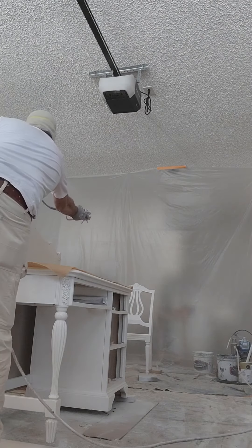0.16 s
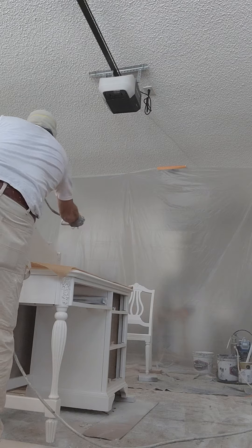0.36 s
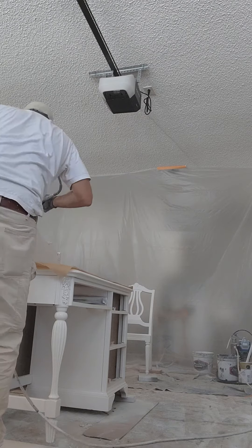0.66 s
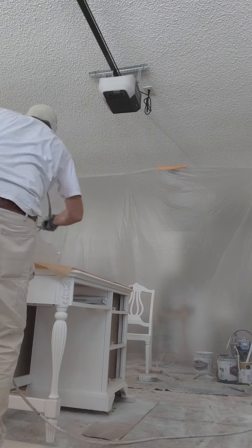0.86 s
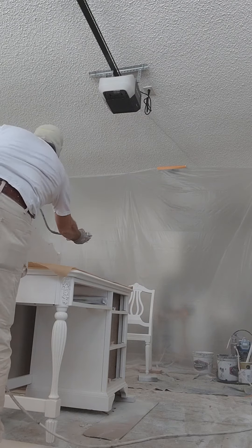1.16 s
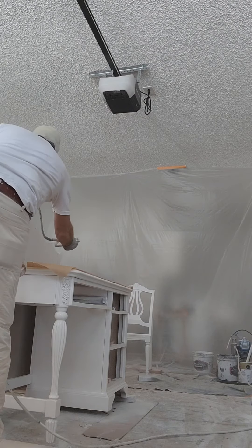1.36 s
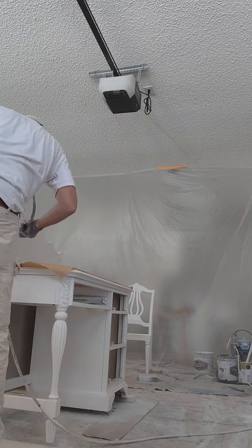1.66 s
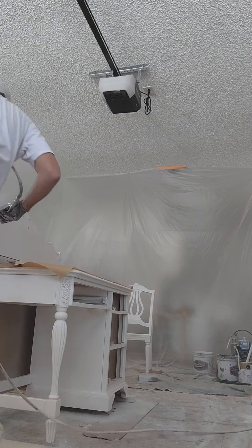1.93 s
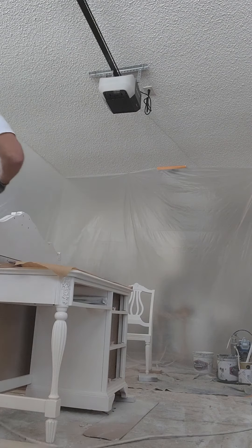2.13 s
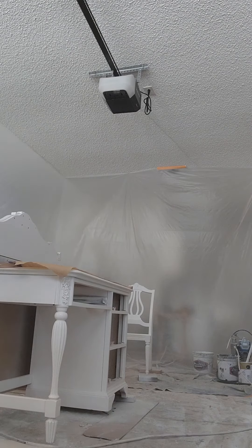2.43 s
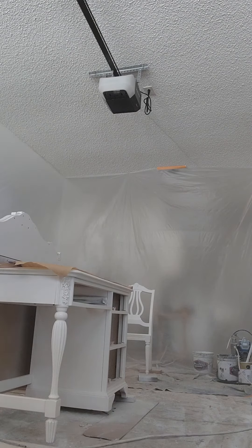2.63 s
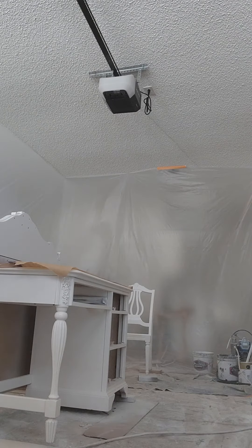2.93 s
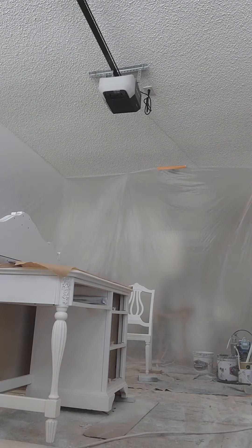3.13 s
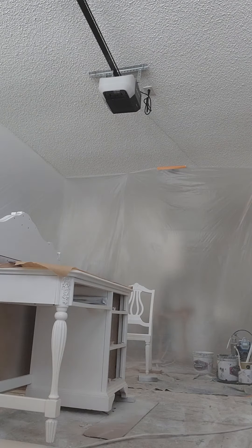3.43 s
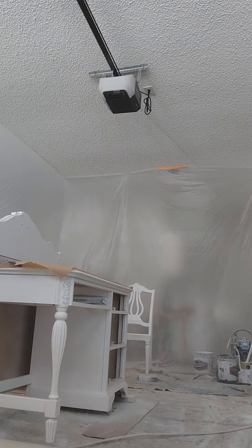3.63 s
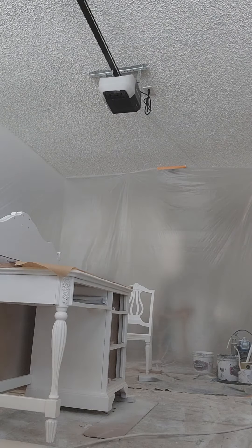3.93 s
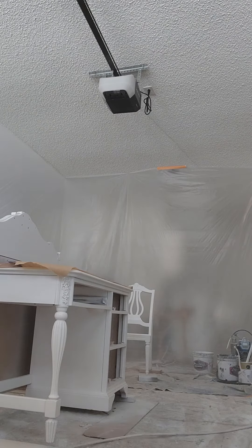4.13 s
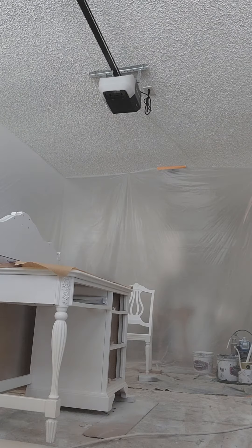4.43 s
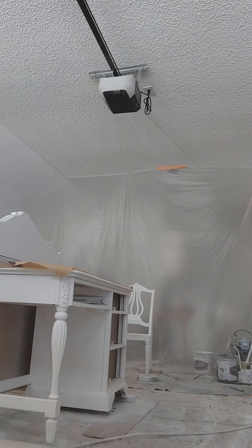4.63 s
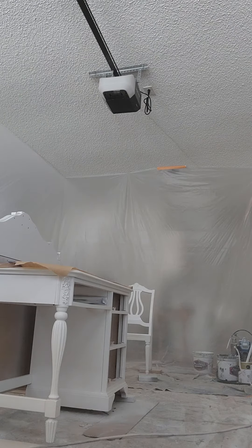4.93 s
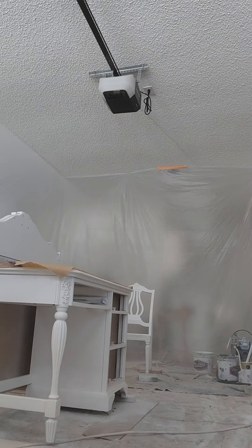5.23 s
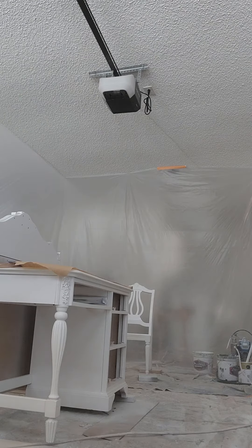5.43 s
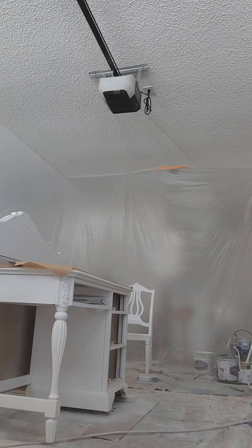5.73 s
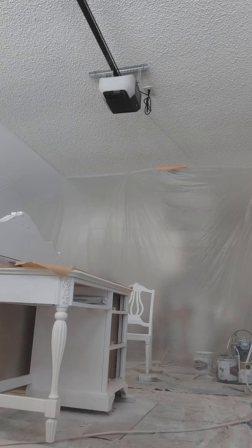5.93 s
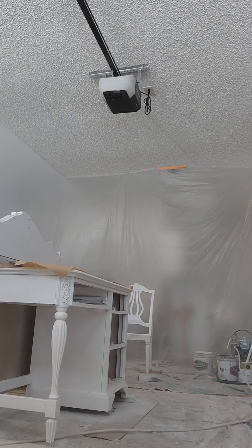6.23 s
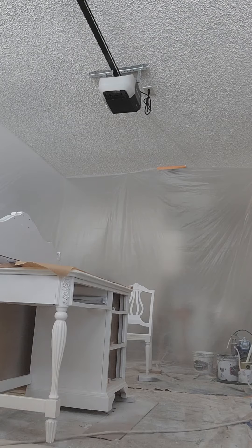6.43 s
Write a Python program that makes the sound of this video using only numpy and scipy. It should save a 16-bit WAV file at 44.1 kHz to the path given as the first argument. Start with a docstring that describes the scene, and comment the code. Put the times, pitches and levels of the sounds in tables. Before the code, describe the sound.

A paint spray gun hisses in bright bursts in a garage, each starting with a soft thump while the jet drums low and unevenly on wooden furniture. Four bursts of about 0.4 seconds run from the start to 1.8 seconds. In the lull that follows, feet or a hose scuff the floor faintly at about 2.1 seconds. Spraying resumes at 2.6 seconds with a longer burst, then continues in gradually shorter passes, loudest around 5.5 seconds, with three quick spurts from 6.1 to 6.7 seconds. An electric pump runs in half-second spells, starting near 0.5, 1.3, 2.9, 3.8, 4.8 and 5.8 seconds. Each time its motor growls, its gears whine in quick pulses that stand out above the hiss, and its valves puff. The bare walls add a short echo over a faint room hush, heard in stereo through a phone.

```python
"""An airless paint gun sprays furniture in a garage: each trigger pull lets out a hissing jet,
and the blast drums on the wood. An electric piston pump runs in short spells: its gears whine
once a stroke, its valves puff and its housing growls. Feet and hose scuff the floor.
The bare walls echo, and a phone with two microphones listens."""
import sys
import numpy as np
from scipy import signal
from scipy.fft import rfft, irfft, next_fast_len
from scipy.io import wavfile
from scipy.ndimage import uniform_filter1d, map_coordinates

SR = 44100
rng = np.random.default_rng(int(sys.argv[2]) if len(sys.argv) > 2 else 0)


def master_out(mix):
    """Clip the mix to full scale and print it as 16-bit PCM to the path in sys.argv[1]."""
    frames = np.transpose(np.atleast_2d(mix))
    ceiling = np.clip(frames, -1, 1)
    pcm = np.round(ceiling * 32767).astype(np.int16)
    wavfile.write(sys.argv[1], SR, pcm)


N = 290005
LEAD = SR // 2  # extra samples before time zero, so the walls already ring
T = np.arange(-LEAD, N) / SR

# Spells of spray hiss: trigger pulls, plus one faint lingering hiss near 5.8 s.
# Each row: start, end and rise time in seconds, then fizz, hiss and starting thump in dB.
HISS_SPELLS = [(-.3, .241, .01, -37, -39.5, -50), (.409, .762, .011, -35.5, -40, -39),
               (.876, 1.352, .012, -34.5, -39.5, -48), (1.411, 1.82, .03, -37.5, -41, -37),
               (2.638, 3.278, .0065, -33.5, -38.5, -32), (3.414, 3.817, .021, -35, -38, -38),
               (3.86, 4.232, .019, -37, -40.5, -33), (4.28, 4.591, .022, -36, -38.5, -42),
               (4.661, 4.965, .015, -34, -39.5, -32), (5.037, 5.324, .02, -34.5, -38.5, -42),
               (5.404, 5.68, .015, -29.3, -36.5, -38), (5.736, 5.91, .028, -53, -50, -70),
               (6.081, 6.226, .023, -35, -39.5, -28.5), (6.339, 6.455, .02, -34, -40, -32),
               (6.556, 6.7, .01, -37, -43, -33)]
# The jet's high fizz, hiss and low roar. Each row: frequency in Hz, relative level in dB.
FIZZ_TONE = [(8000, -16), (10000, -9), (11300, -4.5), (13000, 2), (16000, -1.5)]
HISS_TONE = [(260, -71), (450, -20), (547, -24), (639, -19.5), (1050, -11.5), (1130, -13), (2140, -10),
             (2880, -12), (5580, -1.5), (7420, -3.5), (10000, -23), (13000, -59), (22000, -120)]
ROAR_TONE = [(150, -64), (285, -0.5), (480, -6.5), (700, -9.5), (950, -48)]
# How hard the jet hits the wood. Each row: time in seconds, level in dB.
BLAST_LEVELS = [(0, -44.5), (.3, -50), (.7, -49), (.8, -30), (.86, -39), (.92, -40.5), (1.0, -49),
                (1.3, -58), (1.6, -55), (1.85, -41), (2.1, -52), (2.64, -50), (2.95, -47), (3.25, -34),
                (3.46, -39), (3.7, -56), (3.8, -43), (4.0, -51), (4.2, -36), (4.4, -38), (4.55, -51),
                (5.0, -46), (5.25, -30.5), (5.4, -36), (5.5, -30), (5.66, -31), (5.8, -54), (6.04, -60),
                (6.1, -39), (6.58, -48)]
# The drumming wood. Each row: frequency in Hz, relative level in dB.
DRUM_TONE = [(20, -39), (41, -13), (65, -1), (88, 2), (125, 0), (170, 0), (215, -7), (280, -14), (400, -22),
             (600, -90)]
# Pump runs. Each row: on and off times in seconds, growl in dB, then the spin-up whine's time in seconds,
# level in dB and early pitch in Hz, and last the time in seconds when the piston is at the bottom.
PUMP_RUNS = [(-.3, -.045, -29, -.2, -30, 1100, -.6), (.461, .92, -32.5, .55, -27, 1025, .548),
             (1.324, 1.865, -31.5, 1.434, -23, 1100, 1.498), (2.873, 3.408, -31, 2.986, -20.5, 1102, 3.041),
             (3.84, 4.384, -31.5, 3.945, -26, 1103, 4.009), (4.787, 5.35, -31.5, 4.894, -22, 1115, 4.956),
             (5.802, 6.097, -31, 5.88, -28, 1122, 5.947)]
# The piston goes up, down, up, down.
# Each row: seconds after the bottom, whine in dB, early pitch in Hz, valve puff in dB.
PISTON_STROKES = [(0, -21, 1600, -29.5), (.11, -20.5, 1475, -30.5), (.232, -21, 1545, -26),
                  (.342, -24.5, 1460, -32)]
# Notes the pump housing rings at. Each row: frequency in Hz, width in Hz, relative level in dB.
HOUSING_NOTES = [(284, 13.3, -6.5), (446, 65, -11), (515, 25, -7), (595, 50, -4), (820, 27, -10),
                 (1100, 38, -4.5), (1300, 46, -1.5), (1526, 200, -5), (2215, 77, -8), (3046, 56, -11)]
# Broad motor noise and valve puffs. Each row: frequency in Hz, relative level in dB.
MOTOR_TONE = [(150, -40), (300, -18), (600, -5), (850, -6), (1200, -1), (2000, -10), (4500, -4.5),
              (8000, -17), (15000, -74)]
PUFF_TONE = [(600, 0), (1800, 13), (3300, 8.5), (5000, 7.5), (8000, -2), (15000, -30)]
# Scrapes on the floor. Each row: start in seconds, peak level in dB.
FLOOR_SCUFFS = [(2.084, -51), (2.163, -46.5), (2.549, -70)]
# The quiet garage. Each row: frequency in Hz, relative level in dB.
ROOM_TONE = [(15, -30), (25, 9), (157, -10), (190, -33), (263, -6.5), (1560, -8.5), (2050, -9), (3820, -11),
             (6380, -4.5), (9320, -20), (10100, -14), (11000, -17), (16000, -14)]
# The walls' echo. Each row: frequency in Hz, seconds it takes to fade by 60 dB.
ECHO_TIMES = [(150, 0.82), (1400, 0.57), (5000, 0.57), (13000, 0.31)]
# How alike left and right are. Each row: frequency in Hz, likeness (1 is the same, -1 is opposite).
STEREO_LIKENESS = [(60, .99), (200, .98), (420, .91), (720, .5), (1150, -.35), (1600, -.35), (2200, -.05),
                   (15000, -.03)]
# How the two microphones differ. Each row: frequency in Hz, left minus right in dB.
MIC_BALANCE = [(60, 0.1), (120, 0.1), (240, -1), (480, -2.5), (950, -3), (1890, -3), (3000, -4), (4200, -7),
               (5500, -8), (8500, -2.5), (15000, -3)]

SAG_DB_PER_S, REFILL_DB_PER_S = 7, 14  # spraying drains the hose pressure, the pump restores it
SPURT_DB, SPURT_S = 1.8, .09  # pressure held behind the shut valve bursts out first
HISS_FOLLOWS = .9  # share of the pressure swing heard in the hiss
DRUM_LAG_S, DRUM_FADE_S, DRUM_REST_DB = .035, .06, -14  # the wood drums on, then fades to a murmur
MOTOR_RISE_S, MOTOR_FALL_S = .12, .064
LOADED_HZ = 1180  # gear note under full load
SPIN_PUFF_DB = -46  # little paint moves while the motor gathers speed
SCATTER_DB, SCATTER_HZ = .5, 30  # no two strokes meet quite the same load
TOP_HZ = 15850


def paint_jet():
    """The nozzle opens with a low thump of air, then hisses louder or softer with the hose pressure."""
    fizz, hiss, thump = np.zeros((3, len(T)))
    pumping = sum(gate(on, off, MOTOR_RISE_S, MOTOR_FALL_S) for on, off, *_ in PUMP_RUNS)
    pressure_db = np.cumsum(REFILL_DB_PER_S * pumping - SAG_DB_PER_S) / SR
    for on, off, rise, fizz_db, hiss_db, thump_db in HISS_SPELLS:
        span = slice(LEAD + round(on * SR), LEAD + round((off + .2) * SR))
        age = T[span] - T[span][0]
        flow = gate(on, off, rise, fall_s=.061)[span]
        swing_db = pressure_db[span] - pressure_db[span][0] + SPURT_DB * np.exp(-age / SPURT_S)
        fizz[span] += flow * amp(fizz_db + swing_db)
        hiss[span] += flow * amp(hiss_db + HISS_FOLLOWS * swing_db)
        phase = 2 * np.pi * 110 * age + .85 * (1 - np.exp(-age / .00033))  # 110 Hz with a sharp start
        thump[span] -= amp(thump_db - 60 * age / .077) * np.sin(phase)
    flutter = amp(.6 * wobble(7))  # the fan of paint sweeps over edges and hollows
    roar = noise(ROAR_TONE, patchy_db=2)
    body = noise(HISS_TONE, patchy_db=1.6) + amp(-11) * roar
    spray = flutter * (fizz * noise(FIZZ_TONE, patchy_db=1.5) + hiss * body)
    return wall_echo(spray, echo_db=-3) + [[1], [0]] * thump  # the thump sits in the middle


def drumming_wood():
    """The jet's moving air drums unevenly on the wooden panels, sinking to a murmur between spells."""
    times, blast_db = np.transpose(BLAST_LEVELS)
    spells = [gate(on, off + DRUM_LAG_S, rise, DRUM_FADE_S) for on, off, rise, *_ in HISS_SPELLS]
    blowing = np.maximum(np.max(spells, axis=0), amp(DRUM_REST_DB))
    level = amp(np.interp(T, times, blast_db)) * blowing
    lumps = amp(wobble(25))
    return level * unit(lumps * noise(DRUM_TONE, patchy_db=1.9))


def motor_growl():
    """The pump's motor makes its housing ring, and adds a broad noise that grows faster with speed."""
    def housing(hz):
        return np.sqrt(sum(amp(2 * db) / (1 + ((hz - note) / (width / 2)) ** 2)
                           for note, width, db in HOUSING_NOTES))

    level = sum(amp(db) * gate(on, off, MOTOR_RISE_S, MOTOR_FALL_S) ** 1.48
                for on, off, db, *_ in PUMP_RUNS)
    broad = noise(MOTOR_TONE, patchy_db=.8)
    ringing = unit(filtered(noise([(100, 0)], patchy_db=2.5), housing))
    return level * (ringing + amp(-3) * broad * np.sqrt(level / level.max()))


def pump_strokes():
    """List each run's spin-up, then the piston strokes that fit in before the motor switches off."""
    rows = []
    for _, off, _, spin_s, spin_db, spin_hz, bottom_s in PUMP_RUNS:
        rows.append((spin_s, spin_db, spin_hz, SPIN_PUFF_DB))
        scatter = rng.standard_normal((len(PISTON_STROKES), 2)) * [SCATTER_DB, SCATTER_HZ]
        for (delay, db, hz, puff_db), (more_db, more_hz) in zip(PISTON_STROKES, scatter):
            if spin_s + .03 < bottom_s + delay < off:
                rows.append((bottom_s + delay, db + more_db, hz + more_hz, puff_db))
    return rows


def gears_and_valves():
    """The gear note rises at spin-up and sags as each stroke loads the motor; a valve puffs each time."""
    whine, puffs = np.zeros((2, len(T))), np.zeros(len(T))
    teeth = np.array([wobble(280), wobble(280)])  # uneven teeth smear the note
    for peak_s, whine_db, early_hz, puff_db in pump_strokes():
        span = slice(LEAD + round((peak_s - .1) * SR), LEAD + round((peak_s + .15) * SR))
        age = T[span] - peak_s
        loaded = early_hz > LOADED_HZ  # false for a spin-up
        pitch = LOADED_HZ + (early_hz - LOADED_HZ) * np.clip(.8 - age / .09, 0, 1.1)
        phase = 2 * np.pi * np.cumsum(pitch) / SR + rng.uniform(0, 2 * np.pi, (2, 1))
        swell = bump(age, .022) + .29 * loaded * bump(age - .05, .044)  # a stroke labours at its end
        rough = .7 + (.68 if loaded else .25) * teeth[:, span]
        whine[:, span] += amp(whine_db) * swell * rough * np.sin(phase)
        puff_age = age + .031  # the valve blows just before the gears take the load
        puffs[span] += amp(puff_db) * bump(puff_age, np.where(puff_age < 0, .015, .035))
    return whine + puffs * noise(PUFF_TONE, patchy_db=.5)


def floor_scuffs():
    """Feet and hose rub the floor in short, dull scrapes."""
    level = sum(amp(db) * gate(start, start + .018, .0043, .16) for start, db in FLOOR_SCUFFS)
    return level * noise([(60, 14.5), (600, 6), (6000, .5), (15000, -29)], patchy_db=1)


def quiet_garage():
    """A faint background hush that wavers a little."""
    hush = noise(ROOM_TONE, patchy_db=1.5)
    return amp(-55 + .87 * wobble(9.3)) * hush


def wall_echo(sound, echo_db):
    """The bare walls add a tail in which each frequency dies away at its own speed."""
    hz, t, grid = signal.stft(rng.standard_normal((2, SR * 3 // 4)), SR, nperseg=256)
    tail = signal.istft(grid * amp(-60 * t / look_up(ECHO_TIMES, hz)[:, None]), SR, nperseg=256)[1]
    size = tail.shape[1]
    build_up = np.sqrt(look_up(ECHO_TIMES, np.fft.rfftfreq(2 * size, 1 / SR)))
    tail = irfft(rfft(tail, 2 * size) / build_up)[:, :size]  # same energy at every frequency
    echo = signal.fftconvolve(sound, tail / np.linalg.norm(tail[0]), axes=1)[:, :len(T)]
    return (sound + amp(echo_db) * echo) / np.sqrt(1 + amp(2 * echo_db))


def amp(db):
    """Turn decibels into a number to multiply by."""
    return 10 ** (np.asarray(db) / 20)


def unit(sound):
    """Scale a sound to an average power of 1."""
    return sound / np.sqrt(np.mean(sound ** 2) + 1e-20)


def look_up(table, hz):
    """Read between a table's rows, with every octave equally wide."""
    frequencies, values = np.transpose(table)
    return np.interp(np.log(hz + 1), np.log(frequencies + 1), values)


def filtered(sound, gain_at):
    """Multiply each frequency in a sound by gain_at(hz)."""
    size = next_fast_len(sound.shape[-1] + SR // 4)
    gains = gain_at(np.fft.rfftfreq(size, 1 / SR))
    return irfft(rfft(sound, size) * gains, size)[..., :sound.shape[-1]]


def gate(on, off, rise_s, fall_s):
    """Go from 0 to 1 and back in straight ramps."""
    return np.clip(np.minimum((T - on) / rise_s, 1 - (T - off) / fall_s), 0, 1)


def bump(offset, width):
    """A bell-shaped hill, 1 high at offset zero."""
    return np.exp(-(offset / width) ** 2)


def wobble(rate):
    """A smooth curve through `rate` random points a second."""
    points = rng.standard_normal(int(len(T) * rate / SR) + 4)
    return map_coordinates(points, [np.arange(len(T)) * rate / SR])


def noise(tone, patchy_db):
    """Two unrelated noises with the same tone and the same random loud and soft patches."""
    grid = signal.stft(rng.standard_normal((2, len(T))), nperseg=512)[2]
    patches = uniform_filter1d(rng.standard_normal(grid.shape[1:]), 5, axis=0)
    patches = uniform_filter1d(patches, 10, axis=1)
    pair = signal.istft(grid * amp(patchy_db * unit(patches)), nperseg=512)[1][:, :len(T)]
    return unit(filtered(pair, lambda hz: amp(look_up(tone, hz))))


def to_stereo(pair):
    """Blend two unrelated signals into left and right, alike in the bass."""
    def shares(hz):
        angle = np.arccos(np.clip(look_up(STEREO_LIKENESS, hz), -1, 1)) / 2
        return np.array([np.cos(angle), np.sin(angle)])

    middle, side = filtered(pair, shares)
    return np.array([middle + side, middle - side])


def scene():
    """Mix the gun, the pump and the scuffs over the hush of the garage."""
    hush = quiet_garage()
    gun = paint_jet() + drumming_wood()
    pump = motor_growl() + gears_and_valves()
    pump_and_scuffs = wall_echo(pump + floor_scuffs(), echo_db=-5)
    return to_stereo(gun + pump_and_scuffs + hush)[:, LEAD:]


def record(dry):
    """The two microphones differ in tone, share a dip near 10 kHz and keep nothing above TOP_HZ."""
    def microphones(hz):
        balance = amp(np.outer([.5, -.5], look_up(MIC_BALANCE, hz)))
        dip = amp(-12 * bump(hz - 10100, 600))
        return balance * dip * (hz < TOP_HZ)

    return filtered(dry, microphones)


dry = scene()
out = record(dry)
master_out(out)
```